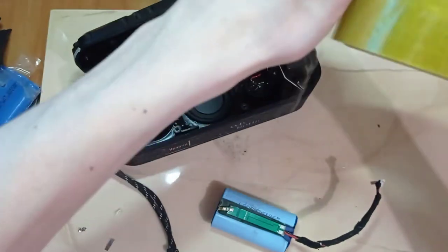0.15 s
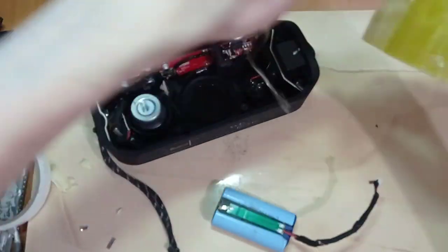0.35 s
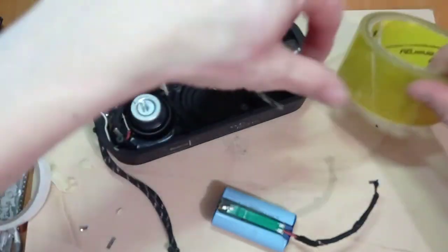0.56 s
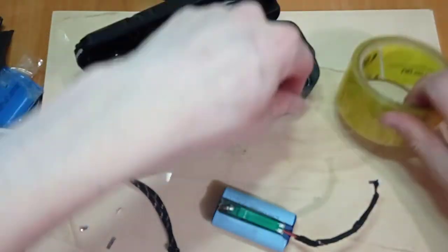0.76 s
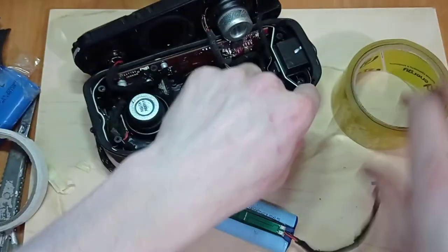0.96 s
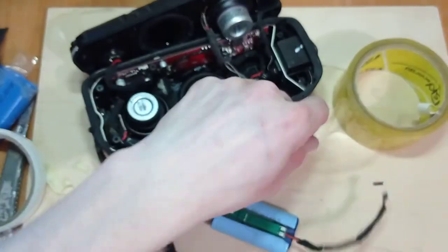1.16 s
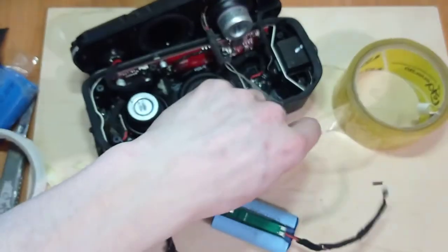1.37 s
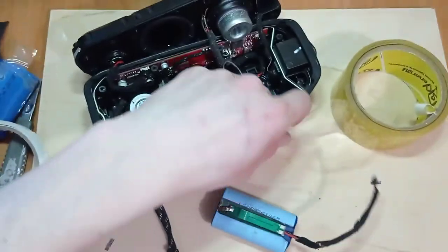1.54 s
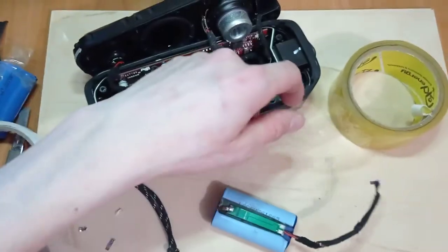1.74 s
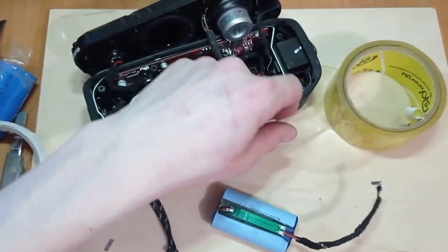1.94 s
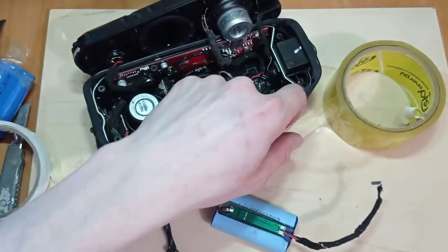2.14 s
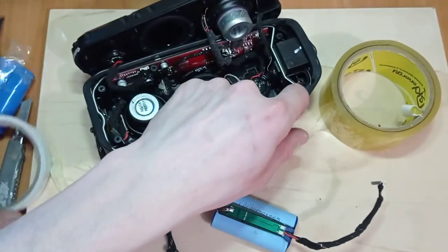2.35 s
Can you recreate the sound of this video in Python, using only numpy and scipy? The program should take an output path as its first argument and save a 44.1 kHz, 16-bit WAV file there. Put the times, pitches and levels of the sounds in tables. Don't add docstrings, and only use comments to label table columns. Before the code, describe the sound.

A quick, bright tearing rip of sticky tape, then the roll set down and plastic tapped

```python
import sys
import numpy as np
from scipy import signal
from scipy.fft import rfft, irfft
from scipy.io import wavfile

SR = 44100
rng = np.random.default_rng(int(sys.argv[2]) if len(sys.argv) > 2 else 0)


def volts(x):
    e = np.asarray(x, float) / 20
    return 10 ** e


def wav_out(sig):
    wavfile.write(sys.argv[1], SR, np.round(np.clip(np.atleast_2d(sig).T, -1, 1) * 32767).astype(np.int16))


N = 110250

# t/s, snap level/dB, tear level/dB, length/s, strip tone f/Hz
RIP_SLIPS = [(.3002, -15.5, -26.5, 0.0064, 6540), (.3065, -40, -34.5, .004, 6200),
             (.3128, -33, -30, 0.0071, 5460), (.3228, -25.5, -31, 0.0017, 6500),
             (.327, -30.5, -28, 0.0054, 5630), (.3325, -35, -34.5, .003, 4540),
             (.3408, -22, -32.5, .0015, 5700), (.3455, -21, -31, 0.0013, 6080),
             (.3475, -38, -22.5, 0.0072, 5500), (.3565, -23, -28.5, 0.0013, 6500),
             (.359, -28.5, -22, 0.0036, 4670), (.3625, -24.5, -26, .0015, 5950),
             (.3672, -21, -29, 0.0013, 6600), (.368, -10, -27.5, 0.0013, 3620),
             (.3705, -24.5, -21.5, 0.003, 6620), (.375, -23.5, -26, .0025, 7200),
             (.381, -22, -24.5, 0.0084, 5680), (.3862, -21, -19.5, 0.0025, 4300),
             (.390, -20, -34, 0.00069, 6385), (.4002, -9, -24, .002, 3340),
             (.4032, -20.5, -31.5, .0015, 6200), (.4055, -20, -26.5, 0.0034, 3090),
             (.419, -4.5, -20.5, .0035, 2810), (.4235, -17.5, -19.5, 0.0025, 2825),
             (.4295, -35, -39.5, 0.0057, 6300), (.436, -12.5, -31, 0.0017, 5850),
             (.443, -26, -29, 0.005, 6680), (.457, -29.5, -40, .0017, 2648),
             (.4662, -13, -37.5, .002, 5000), (.469, -31, -31, 0.0053, 2850)]
# f/Hz, level/dB
RIP_COLOUR = [(300, -29.5), (1100, -15), (2200, -9.5), (6500, -2), (8200, -5), (12800, -17.5), (15000, -7),
              (16800, -28)]
# f/Hz, width/Hz, level/dB
CORE_MODES = [(670, 160, 1), (866, 60, -2), (1252, 210, -3.5), (2230, 67, -9)]


def rip():
    pull = slips(RIP_SLIPS, RIP_COLOUR, rise_s=0.00055)
    return add_modes(pull, -8.5, CORE_MODES)


# t/s, snap level/dB, tear level/dB, length/s, strip tone f/Hz
PICK_SLIPS = [(.0155, -43.5, -55, 0.0081, 5000), (.043, -78, -66, 0.0088, 6390),
              (.069, -74, -66.5, 0.0068, 5000), (.114, -62, -65, 0.0034, 5030),
              (.1475, -62, -42, 0.014, 5820), (.170, -53.5, -41.5, 0.013, 6500),
              (.204, -48, -29.5, 0.021, 3600), (.2075, -29.5, -21, 0.0035, 6980),
              (.213, -30.5, -42.5, .005, 2330), (.239, -60, -47.5, .004, 6560),
              (.2455, -29, -33, 0.0023, 6700), (.612, -46, -57, 0.0014, 5610),
              (.651, -36.5, -56.5, 0.0034, 6290), (.688, -49, -63.5, 0.02, 2170)]
# t/s, snap level/dB, tear level/dB, length/s, strip tone f/Hz
TICK_SLIPS = [(.911, -69.5, -84, .002, 5950), (.948, -67, -80, .002, 3190),
              (0.976, -49, -61.5, 0.005, 7170), (1.054, -51, -59.5, 0.0049, 6480),
              (1.393, -72, -57, 0.0024, 5000), (1.398, -33.5, -51.5, 0.0036, 6080),
              (1.432, -49, -56.5, 0.0045, 3230), (1.488, -63, -56.5, 0.015, 6540),
              (1.568, -69, -64.5, 0.0074, 6500), (1.748, -45, -70, 0.0023, 6170),
              (1.998, -63, -83, 0.0039, 7470), (2.039, -43, -58, 0.0037, 6050),
              (2.397, -60, -56, 0.0047, 3510)]
# t/s, level/dB
CREEP_LEVEL = [(0.0, -86), (.2, -76.5), (.32, -53.5), (.47, -60), (.6, -82), (.66, -75), (.8, -90.5)]
# f/Hz, level/dB
LIGHT_COLOUR = [(530, -57.5), (900, -38), (2310, -12.5), (6870, -5), (9000, -8.5), (13000, -22),
                (15000, -12), (16800, -30.5)]
# f/Hz, width/Hz, level/dB
STRIP_MODES = [(980, 180, 17.5), (1400, 67, 7.5), (2330, 71, 3), (3600, 72, 0.5), (4370, 110, -4),
               (6980, 250, -8.5), (9170, 580, -1)]


def picks():
    creep = level(CREEP_LEVEL) * colour(grains(N, per_s=6000, spread_db=2.4), LIGHT_COLOUR)
    picked = slips(PICK_SLIPS, LIGHT_COLOUR, rise_s=0.0015)
    ticks = slips(TICK_SLIPS, LIGHT_COLOUR, rise_s=0.00055)
    return add_modes(picked + ticks + creep, -9, STRIP_MODES)


def slips(rows, spectrum, rise_s):
    snap_cut_hz, threads_per_s, thread_spread_db = 4000, 14000, 2.5
    clump_db, clump_s = 2.5, 0.0008
    sag_s, release_s = 0.008, 0.0027
    tone_db, tone_width_hz = 2, 460
    t = np.arange(2000) / SR
    out = np.zeros(N + len(t))
    turn = 2 * np.pi * snap_cut_hz * t
    snap = 2 * turn * np.exp(-turn)
    for s, snap_db, tear_db, length, hz in rows:
        decay = np.exp(-t / sag_s - np.maximum(t - length, 0) / release_s)
        shape = (1 - np.exp(-(t / rise_s) ** 2)) * decay
        tear = volts(tear_db) * grains(len(t), threads_per_s, thread_spread_db) * shape
        clumps = volts(clump_db * wander(50, clump_s)[:len(t)])
        burst = tear * clumps + volts(snap_db) * snap
        tone = 2 * volts(tone_db) * resonance(burst, hz, tone_width_hz)
        i = int(s * SR)
        out[i:i + len(t)] += burst + tone
    return colour(out[:N], spectrum)


# t/s, f/Hz, level/dB, T60/s
ROLL_JOLTS = [
    (.326, 877, -33, .035),
    (.362, 430, -36, .05),
    (.406, 360, -32, .03),
    (.4665, 214, -21, .05),
    (.467, 690, -32, .03),
]


def jolts():
    out = np.zeros(N)
    for s, hz, db, t60 in ROLL_JOLTS:
        t = np.maximum(np.arange(N) / SR - s, 0)
        envelope = volts(db - 60 * t / t60) * (1 - np.exp(-hz * t))
        out += envelope * np.sin(2 * np.pi * hz * t)
    return out


# t/s, level/dB
TUG_LEVEL = [(.3, -78.5), (.36, -55), (.4, -42.5), (.43, -40.5), (.455, -47.5), (.52, -75.5)]
# f/Hz, level/dB
BENCH_SHAKE_COLOUR = [(25, -15), (60, -12.5), (300, 6.5), (900, -7.5), (1600, -47)]


def tug():
    return level(TUG_LEVEL) * colour(rng.standard_normal(N), BENCH_SHAKE_COLOUR)


# t/s, peak level/dB, contact cut f/Hz
SETDOWN_HITS = [
    (.8335, -30.5, 1820),
    (.838, -27, 500),
    (.9595, -23, 2494),
    (.9645, -36, 1480),
    (1.055, -45, 1470),
]
# f/Hz, level/dB, T60/s
BENCH_MODES = [(114, -4, 0.19), (200.4, 4.5, 0.082), (246, 4.5, 0.11), (277, -24, 0.082),
               (436.4, -6.5, 0.071), (550, -4, 0.069), (730, -6.5, 0.071), (1077, -1, 0.036),
               (1324, -1, 0.022), (1990, -32, 0.047), (2500, -25.5, 0.052), (3000, -30, 0.017),
               (4210, -36, 0.062), (5000, -43, 0.041)]
# f/Hz, level/dB
BENCH_RATTLE = [(180, -32), (300, 2), (1130, -10.5), (2000, -14.5), (3200, -24.5), (5200, -32.5),
                (8000, -50.5), (15600, -100)]
# f/Hz, width/Hz, level/dB
BENCH_HIGH_MODES = [(hz, 90, 6) for hz in (3100, 4050, 5050)]


def setdown():
    return impacts(SETDOWN_HITS, BENCH_MODES, BENCH_RATTLE, rattle_db=-11.5, rattle_t60=0.14,
                   high_modes=BENCH_HIGH_MODES, trim_db=-1, swell_s=0.018)


# t/s, peak level/dB, contact cut f/Hz
CASE_HITS = [
    (1.452, -34.5, 2470),
    (1.459, -37.5, 2500),
    (1.468, -34.5, 2500),
    (1.4725, -20, 2020),
    (1.512, -30.5, 2000),
    (1.793, -33, 2470),
    (1.832, -43, 1200),
    (1.860, -61.5, 600),
    (2.411, -24, 2610),
    (2.418, -27.5, 1500),
]
# f/Hz, level/dB, T60/s
CASE_MODES = [(113.8, -8.5, 0.28), (260.3, -4.5, 0.099), (479, 7, 0.052), (627, 5.5, 0.053),
              (750, -14, 0.027), (965, -11, 0.041), (1104, 1.5, 0.017), (1510, -14, 0.039),
              (2202, -5.5, 0.043), (3113, -8.5, 0.019), (3854, -8.5, 0.017)]
# f/Hz, level/dB
CASE_RATTLE = [(120, -35.5), (200, 1), (990, -3.5), (1270, -13), (1570, -11.5), (6400, -28.5), (14000, -55)]
# f/Hz, width/Hz, level/dB
WALL_MODES = [(1117, 48, -7), (2260, 25.2, -0.5), (3007, 130, -2), (3680, 190, -1), (4460, 57, 5),
              (6310, 110, 2.5)]


def case_knocks():
    return impacts(CASE_HITS, CASE_MODES, CASE_RATTLE, rattle_db=-1.5, rattle_t60=0.1,
                   high_modes=WALL_MODES, trim_db=-8, swell_s=0.015)


def impacts(hits, modes, rattle_colour, rattle_db, rattle_t60, high_modes, trim_db, swell_s):
    bend_hz = 323
    longest_ring_s, most_cycles = 0.13, 36
    t = np.arange(15000) / SR
    out = np.zeros(N + len(t))
    for s, db, cut_hz in hits:
        body = 0
        for hz, mode_db, t60 in modes:
            lag = swell_s / (1 + (hz / bend_hz) ** 2)
            swell = 1 - np.exp(-(t / lag) ** 2)
            ring_s = min(t60, longest_ring_s, max(most_cycles / hz, 0.04))
            decay = volts(mode_db + 2.0 * rng.normal() - 60 * t / ring_s)
            tone = np.sin(2 * np.pi * (hz * t + rng.random()))
            body = body + decay * swell * tone / np.hypot(1, hz / cut_hz)
        flutter_db = 2.2 * wander(60, 0.006)[:len(t)]
        decay = volts(rattle_db - 60 * t / rattle_t60 + flutter_db)
        noise = add_modes(colour(rng.standard_normal(len(t)), rattle_colour), -14.5, high_modes)
        rattle = (1 - np.exp(-t / 0.0014)) * decay * noise
        i = int(s * SR)
        out[i:i + len(t)] += volts(db + trim_db) * (body + rattle)
    return out[:N]


# t/s, level/dB
RUB_LEVEL = [(1.44, -72), (1.48, -86), (1.53, -57.5), (1.60, -73), (1.67, -55), (1.71, -63.5),
             (1.75, -54.5), (1.8, -59.5), (1.86, -92), (1.92, -101), (2.03, -85), (2.09, -61),
             (2.14, -80.5), (2.18, -88.5), (2.35, -94), (2.39, -67.5), (2.44, -53), (2.5, -73.5)]
# f/Hz, level/dB
SKIN_COLOUR = [(180, -23), (300, -5), (762, -1.5), (2000, -18.5), (2250, -11), (3950, -22.5), (6410, -23.5),
               (9000, -34.5), (16000, -56)]


def rub():
    pressure = level(RUB_LEVEL) * volts(2.0 * wander(400, 0.0031))
    touch = pressure * grains(N, per_s=5500, spread_db=3.2)
    case = 0
    for hz, db, t60 in CASE_MODES[1:]:
        case = case + volts(db + 5) * resonance(touch, hz, 1.4 / t60)
    return add_modes(colour(touch, SKIN_COLOUR), -7, WALL_MODES) + case


# start t/s, length/s, f/Hz, width/Hz, level/dB
SKIN_SQUEAK = (2.05, .115, 2430, 50, -70)


def squeak():
    start, length, hz, width, db = SKIN_SQUEAK
    phase = np.clip((np.arange(N) / SR - start) / length, 0, 1)
    band = resonance(resonance(rng.standard_normal(N), hz, width), hz, width)
    return volts(db) * np.sin(np.pi * np.sqrt(phase)) * rms_one(band)


# t/s, level/dB
BRUSH_LEVEL = [(2.18, -100), (2.23, -75), (2.3, -105.5)]


def sleeve():
    return level(BRUSH_LEVEL) * colour(rng.standard_normal(N), LIGHT_COLOUR)


def room(x):
    t = np.arange(SR // 2) / SR
    noise = rng.standard_normal(len(t))
    low = signal.sosfilt(signal.butter(2, 4500, fs=SR, output="sos"), noise)
    tail = low * volts(-60 * t / 0.21) + (noise - low) * volts(-60 * t / 0.13)
    tail = tail * (t > 0.003)
    return volts(-11.5) * signal.fftconvolve(x, tail / np.sqrt(np.sum(tail ** 2)))[:N]


# t/s, level/dB
DRONE_LEVEL = [(0.0, -55.5), (.1, -57.5), (.19, -55), (.3, -60.5), (.55, -76), (.66, -65), (.73, -69),
               (.79, -86), (.85, -60.5), (1.1, -63), (1.3, -65.5), (1.55, -67.5), (1.7, -56.5),
               (1.9, -57.5), (2.1, -62.5), (2.27, -57.5), (2.5, -64.5)]
# f/Hz, level/dB
DRONE_SPECTRUM = [(25, -53.5), (100, -5.5), (400, -8.5), (520, -39)]
# f/Hz, width/Hz, level/dB
DRONE_MODES = [(114, 25, -5), (147, 27, -2.5), (256, 13, -1), (348, 35, 5.5)]
# f/Hz, level/dB
HISS_COLOUR = [(400, -29.5), (600, -1.5), (900, -7), (6000, -17), (16000, -33)]


def drone():
    low = volts(-9) * colour(rng.standard_normal(N), DRONE_SPECTRUM)
    for hz, width, db in DRONE_MODES:
        hum = resonance(resonance(rng.standard_normal(N), hz, width * 2), hz, width * 2)
        low = low + volts(db + 7.5 * wander(100, 0.069)) * rms_one(hum)
    hiss = volts(-89) * colour(rng.standard_normal(N), HISS_COLOUR)
    return level(DRONE_LEVEL) * rms_one(low) + hiss


def rms_one(x):
    return x / np.sqrt(np.mean(x ** 2) + 1e-30)


def level(rows):
    s, db = np.transpose(rows)
    after = db[-1] if s[-1] > 2.4 else -150
    return volts(np.interp(np.arange(N) / SR, s, db, left=-150, right=after))


def colour(x, spectrum):
    hz, db = np.transpose(spectrum)
    grid = np.maximum(np.arange(2049) * SR / 4096, 1)
    log_gain = np.interp(np.log(grid), np.log(hz), np.maximum(db, -70)) * np.log(10) / 20
    cepstrum = irfft(log_gain)
    cepstrum[1:2048] *= 2
    cepstrum[2049:] = 0
    h = irfft(np.exp(rfft(cepstrum)))
    return signal.fftconvolve(x, h / np.sqrt(np.sum(h ** 2)))[:len(x)]


def resonance(x, hz, width_hz):
    r = np.exp(-np.pi * width_hz / SR)
    poles = [1, -2 * r * np.cos(2 * np.pi * hz / SR), r * r]
    return signal.lfilter([(1 - r * r) / 2, 0, (r * r - 1) / 2], poles, x)


def add_modes(x, db, modes):
    ringing = 0
    for hz, width, mode_db in modes:
        ringing = ringing + volts(mode_db) * np.sqrt(SR / width / 30) * resonance(x, hz, width)
    return x + volts(db) * ringing


def grains(size, per_s, spread_db):
    born = rng.random(size) < per_s / SR
    strength = volts(spread_db * np.minimum(rng.exponential(1, size), 4))
    return rms_one(born * strength * rng.choice([-1, 1], size))


def wander(size, seconds):
    steps = rng.standard_normal(size)
    return np.interp(np.arange(N) / SR / seconds, np.arange(size), steps)


def scene():
    tape = picks() + rip() + jolts() + tug()
    friction = rub() + squeak() + sleeve()
    near = tape + friction + setdown() + case_knocks()
    return (near + room(near) + drone())[None]


def band_limit(x):
    return signal.sosfilt(signal.butter(12, 16990, fs=SR, output="sos"), x)


def record(dry):
    mix = signal.sosfilt(signal.cheby2(10, 40, 16900, fs=SR, output="sos"), dry)
    return band_limit(mix)


dry = scene()
out = record(dry)
wav_out(out)
```